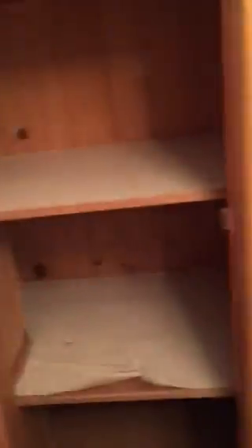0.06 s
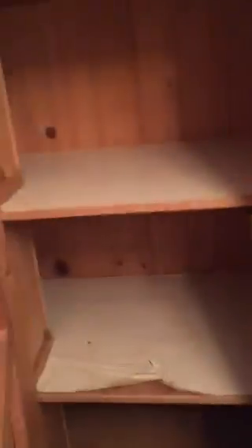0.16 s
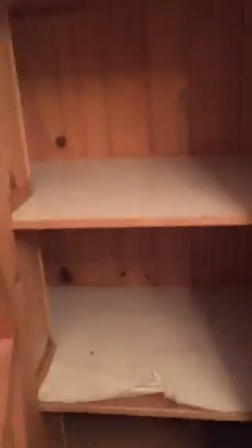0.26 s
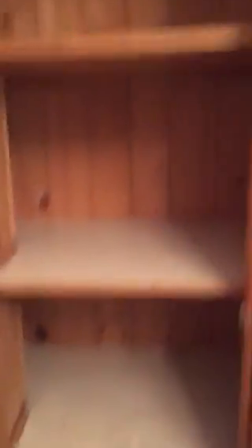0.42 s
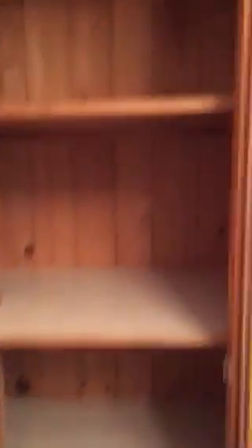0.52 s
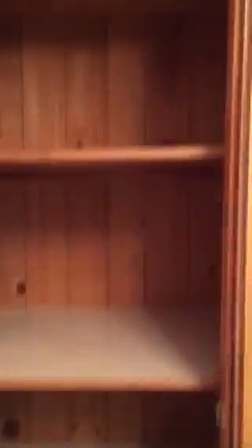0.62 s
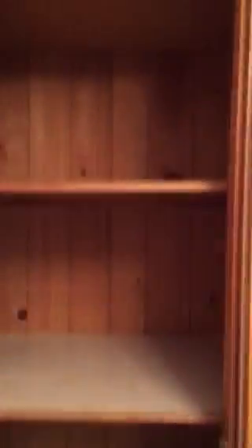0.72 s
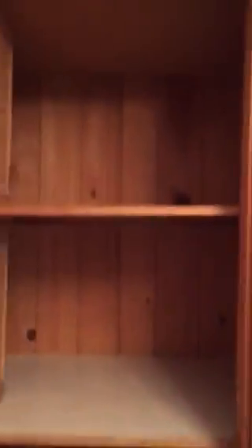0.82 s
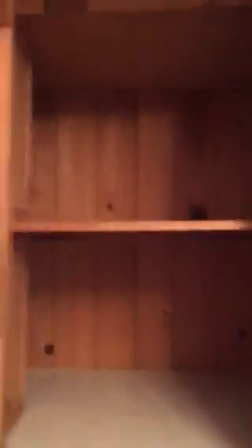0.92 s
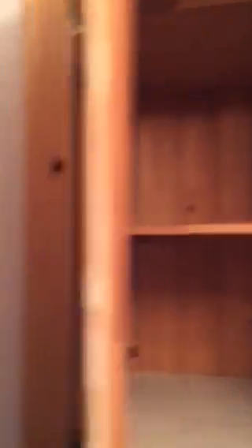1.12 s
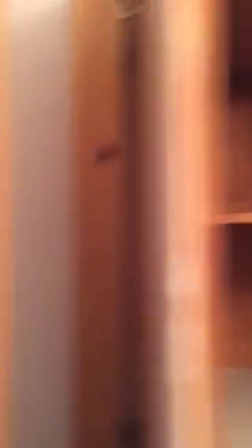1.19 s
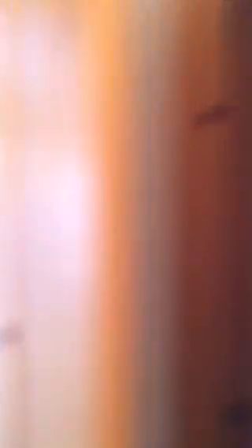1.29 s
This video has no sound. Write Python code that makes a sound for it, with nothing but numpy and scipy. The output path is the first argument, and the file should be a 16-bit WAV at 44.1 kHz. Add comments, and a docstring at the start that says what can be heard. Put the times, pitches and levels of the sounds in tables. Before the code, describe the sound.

A handheld camera's microphone gives a sharp click and the faint room hum cuts out. A tiny pop follows, then a low thump as the room sound returns, with light finger ticks on the case.

```python
"""Loose microphone contact

A handheld camera is carried through a quiet room, fingers ticking and sliding on its case.
The microphone contact chatters open with a sharp click, the room drops out into faint hiss,
and the contact closes with a low thump. Each time the input sticks at its limit, then drifts back."""
import sys
import numpy as np
from scipy import signal
from scipy.fft import rfft, irfft, next_fast_len
from scipy.io import wavfile
from scipy.ndimage import map_coordinates

SR = 44100
rng = np.random.default_rng(int(sys.argv[2]) if len(sys.argv) > 2 else 0)


def wrap_up_sound(samples):
    """Save the sound to the file named by the first command line argument, as 16-bit audio."""
    columns = np.atleast_2d(samples).T
    # keep every value between -1 and 1, then stretch to whole-number steps
    tamed = np.clip(columns, -1, 1)
    steps = np.round(tamed * 32767).astype(np.int16)
    wavfile.write(sys.argv[1], SR, steps)


N = 59535

BREAK_S, BREAK_HOLD_S = .24111, .0242  # the contact opens; how long the input sticks
CLOSE_S, CLOSE_HOLD_S = .93885, .013  # the contact closes; how long the input sticks


def amp(db):
    """Decibels to gain."""
    return 10 ** (np.asarray(db) / 20)


def unit(x):
    """x at rms 1."""
    return x / np.sqrt(np.mean(x ** 2) + 1e-20)


def since(s):
    """Seconds since s, for every sample."""
    return np.arange(N) / SR - s


def wobble(rate):
    """A smooth random curve, rate knots a second."""
    return map_coordinates(rng.standard_normal(int(N * rate / SR) + 4), [np.arange(N) * rate / SR])


def noise(eq):
    """Noise of rms 1, coloured by a curve of (Hz, dB) points."""
    size = next_fast_len(N + SR // 2)
    hz, db = np.transpose(eq)
    gain = amp(np.interp(np.log(np.fft.rfftfreq(size, 1 / SR) + 1), np.log(hz + 1), db))
    return unit(irfft(rfft(rng.standard_normal(size)) * gain, size)[:N])


def fade(t, t60):
    """Exponential decay by 60 dB in t60 seconds."""
    return np.exp(-np.log(1000) * t / t60)


def lowpass(x, hz, order):
    """Roll off the top above hz."""
    return signal.sosfiltfilt(signal.butter(order, min(hz, SR / 2 - 1), fs=SR, output="sos"), x)


# Room tone EQ before and after the dropout (frequency [Hz], level [dB])
ROOM_EQ_BEFORE = [(20, -2), (45, 1), (70, -4), (120, 2), (180, -6), (380, -6.5), (560, -7.5), (750, -14),
                  (1050, -9), (1450, -20.5), (1850, -23.5), (2150, -19), (2500, -28), (3500, -30),
                  (6500, -36.5), (12000, -34.5), (15500, -39), (16300, -67.5)]
ROOM_EQ_AFTER = [(20, -2), (45, 1), (80, -9), (130, -1.5), (175, -4.5), (240, 2), (400, -2.5), (560, -7),
                 (780, -15.5), (1100, -10.5), (1450, -21), (2100, -21.5), (3000, -28), (6500, -34),
                 (12000, -33), (15500, -36), (16300, -73)]
# Partials of a distant motor (frequency [Hz], rms before the dropout [dB], rms after [dB])
MOTOR_PARTIALS = [(118.85, -59.5, -59), (548, -72.5, -72), (973, -70, -84), (1090, -76, -67),
                  (2187, -79, -82.5)]

def room_tone():
    """A bed of room murmur and wavering motor hum; both change colour as the camera moves on."""
    after = since(BREAK_S) > 0
    hum = 0
    for hz, before_db, after_db in MOTOR_PARTIALS:
        peak = amp(np.where(after, after_db, before_db)) * np.sqrt(2)
        phase = 2 * np.pi * (hz * since(0) + rng.random())
        hum += peak * np.sin(phase + .22 * wobble(12))
    murmur = np.where(after, amp(-54.5) * noise(ROOM_EQ_AFTER), amp(-55.5) * noise(ROOM_EQ_BEFORE))
    return hum + murmur


# Noise floor EQ (frequency [Hz], level [dB])
HISS_EQ = [(20, 5.5), (70, 9.5), (200, 1), (1000, -2), (4000, -5.5), (12000, -6.5), (15500, -7),
           (16300, -43.5)]

def input_hiss():
    """The input's own faint electronic noise."""
    return amp(-73) * noise(HISS_EQ)


# Finger slides (start [s], length [s], level [dB])
SLIDES = [(0.057, .008, -60), (0.121, 0.033, -67), (.954, 0.026, -59)]
# Friction EQ (frequency [Hz], level [dB])
SLIDE_EQ = [(3000, -23), (4500, -16), (5200, 6.5), (6200, -12), (8000, -6), (9700, -3), (12500, 2),
            (15000, -16), (16200, -30), (17000, -60)]

def finger_slides():
    """Skin drags over the case in brief, bright, grainy strokes."""
    strokes = sum(amp(db) * np.sin(np.pi * np.clip(since(s) / length, 0, 1)) for s, length, db in SLIDES)
    friction = noise(SLIDE_EQ)
    grain = amp(4 * wobble(600))
    return strokes * unit(friction * grain)


# Finger ticks (time [s], level [dB], main ring [Hz], thud trim [dB])
FINGER_TICKS = [(.0597, -38, 8900, -7), (0.0676, -44, 12000, -1), (.0772, -42.5, 12000, -11),
                (0.0983, -52, 11900, -12), (0.108, -50, 12500, -14), (.1253, -47, 9800, -15),
                (0.143, -47, 9600, -12), (.312, -42, 10880, -18), (.3285, -52, 2600, -20),
                (0.9663, -39.5, 11500, -17), (.972, -37, 13100, -16), (.9855, -52, 12600, -11),
                (.9942, -52, 12500, -12), (1.0154, -54, 10000, -15), (1.038, -51, 11900, -21),
                (1.0612, -53, 10500, -10), (1.089, -52, 5200, -15), (1.1377, -44, 14000, -7),
                (1.2537, -55, 9000, -22), (1.285, -50, 9750, -18), (1.3078, -54, 13000, -4)]
# Resonances of the case (frequency [Hz], level [dB], t60 [s])
CASE_MODES = [(5190, -15, .004), (9700, -9, .004), (12200, -8, 0.0036)]

def finger_ticks():
    """Each tick is a tiny crack that rings the plastic case and nudges the body into a soft thud."""
    track, t = np.zeros(N + SR), np.arange(SR // 10) / SR
    for s, db, ring_hz, thud_db in FINGER_TICKS:
        ring = 0
        for hz, mode_db, t60 in [(ring_hz, -3, .0034), *CASE_MODES]:
            gain = amp(mode_db + rng.normal(0, 3.1))
            ring += gain * fade(t, t60) * np.sin(2 * np.pi * (hz * t + rng.random()))
        crack = amp(-15) * fade(t, t60=.0036) * unit(np.diff(rng.standard_normal(len(t) + 1)))
        thud = amp(thud_db - 1) * fade(t, t60=.058) * np.sin(2 * np.pi * 124 * t)
        track[round(s * SR):][:len(t)] += amp(db) * (ring + crack - thud)
    return lowpass(track[:N], 14900, order=6)  # the microphone softens the top


LIMIT = .705  # amplitude at which the input sticks

def overload(s, hold_s, swing):
    """The input slams to its limit, sticks, then discharges and swings slowly past zero."""
    knee_s, fast_s, slow_s, swing_s = .0002, .008, .021, .084
    t = knee_s * np.logaddexp(0, since(s + hold_s) / knee_s)  # waits out the hold, then eases in
    discharge = .58 * np.exp(-t / fast_s) + .42 * np.exp(-t / slow_s)
    undershoot = swing * t / swing_s * np.exp(1 - t / swing_s)
    return (since(s) >= 0) * (LIMIT * discharge - undershoot)


# Contact bounces (time after the break [ms], half width [ms], depth [multiples of LIMIT])
CONTACT_BOUNCES = [(.045, .027, 1.87), (.229, .028, 1.28), (.306, .02, .42), (.557, .022, 1.12),
                   (.635, .02, .28)]

def break_click():
    """The contact bounces open, cutting sharp notches into the front of an overload."""
    opens = round(BREAK_S * SR) / SR
    ms = since(opens) * 1000
    chatter = sum(depth * np.exp(-((ms - at) / half) ** 2) for at, half, depth in CONTACT_BOUNCES)
    return overload(opens, BREAK_HOLD_S, swing=.12) - LIMIT * chatter


# Rasp EQ (frequency [Hz], level [dB])
RASP_EQ = [(100, 0), (500, 0), (1200, -3), (3000, -16), (6000, -35), (16000, -60)]

def recovery_rasp():
    """A faint, dark rasp dies away as the input first comes off its limit."""
    t = since(BREAK_S + BREAK_HOLD_S)
    return (t > 0) * amp(-56) * fade(np.abs(t), t60=.06) * noise(RASP_EQ)


def graze_pop():
    """The open contact grazes once: a small pop."""
    t = since(.53067)
    return (t >= 0) * amp(-36.5) * np.exp(-np.abs(t) / .007)


def closing_thump():
    """The voltage runs away ever faster as the contact closes, into a dull, negative overload."""
    closes = round(CLOSE_S * SR) / SR
    ahead_s = np.abs(since(closes))
    run_up = (since(closes) < 0) * LIMIT * (1 + ahead_s / .00007) ** -.74 * np.exp(-ahead_s / .067)
    return -(run_up + overload(closes, CLOSE_HOLD_S, swing=.084))


def mute(start_s, end_s):
    """A hard gate, shut from start_s to end_s."""
    return (since(start_s) < 0) | (since(end_s) > 0)


def scene():
    """Mono mix: room and slides drop out with the contact; ticks and hiss go silent while the input sticks."""
    connected = mute(BREAK_S, CLOSE_S)
    unstuck = mute(BREAK_S, BREAK_S + BREAK_HOLD_S) * mute(CLOSE_S, CLOSE_S + CLOSE_HOLD_S)
    bed = connected * (room_tone() + finger_slides()) + finger_ticks() + input_hiss()
    contact = break_click() + recovery_rasp() + lowpass(graze_pop() + closing_thump(), 14900, order=4)
    return (unstuck * bed + contact)[None]


def record(dry):
    """The camera's band limit: a steep high cut."""
    return lowpass(dry, 16900, order=20)


dry = scene()
out = record(dry)
wrap_up_sound(out)
```